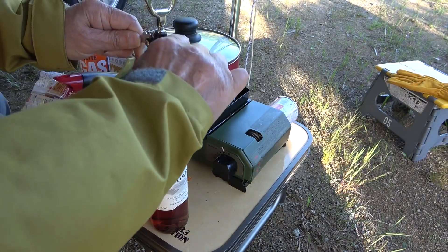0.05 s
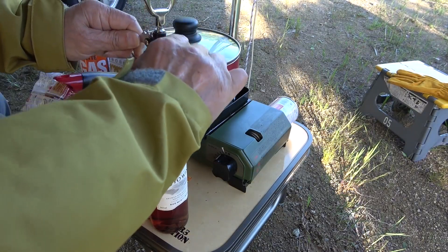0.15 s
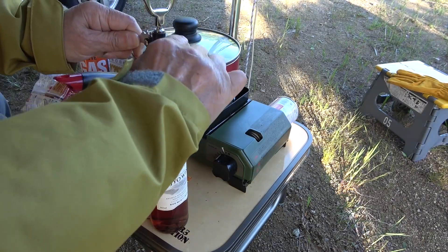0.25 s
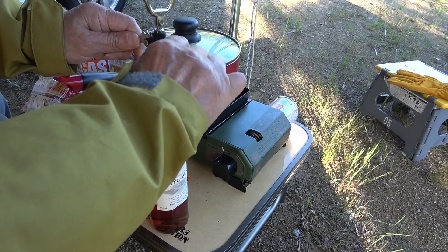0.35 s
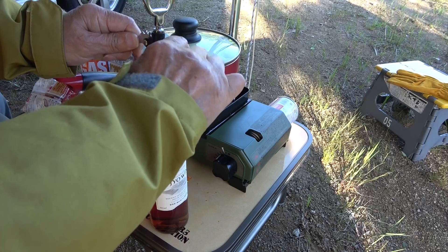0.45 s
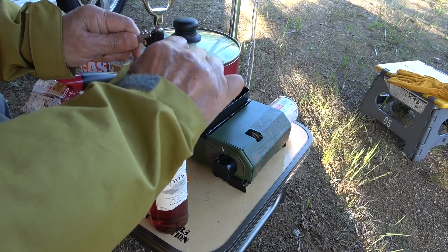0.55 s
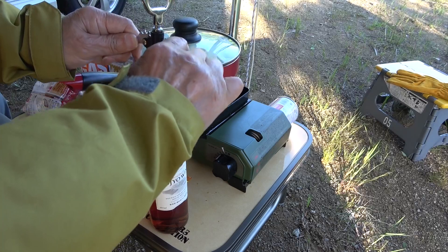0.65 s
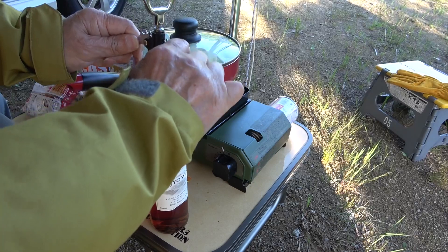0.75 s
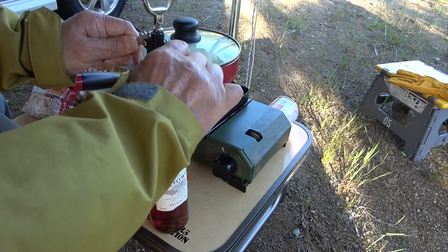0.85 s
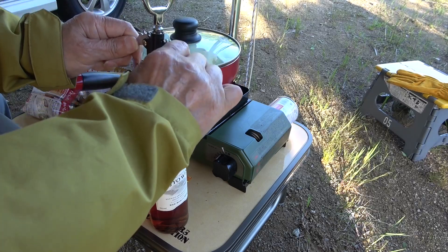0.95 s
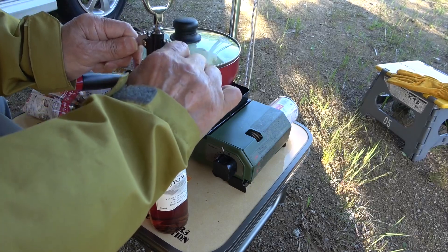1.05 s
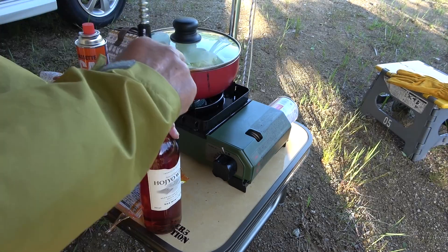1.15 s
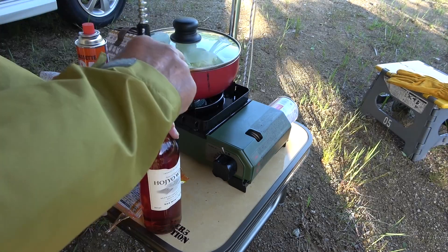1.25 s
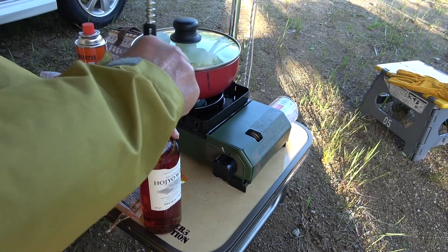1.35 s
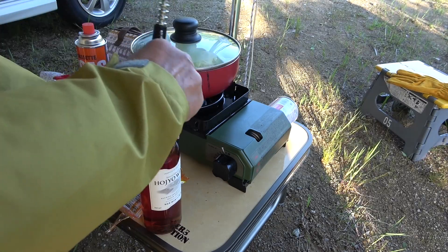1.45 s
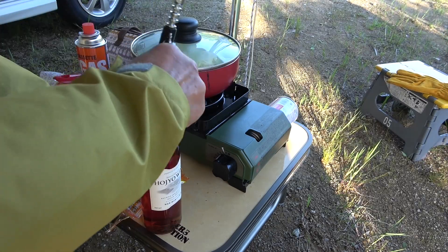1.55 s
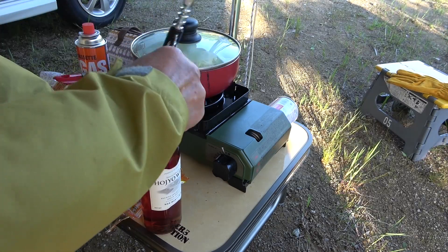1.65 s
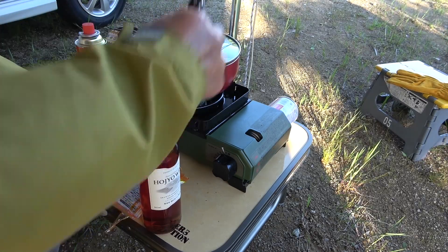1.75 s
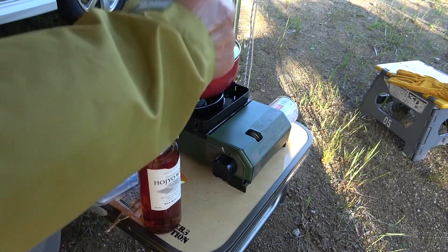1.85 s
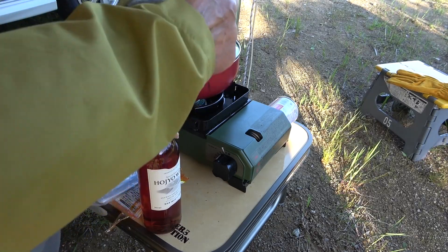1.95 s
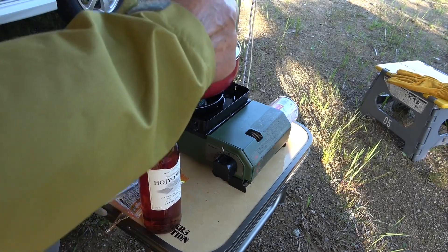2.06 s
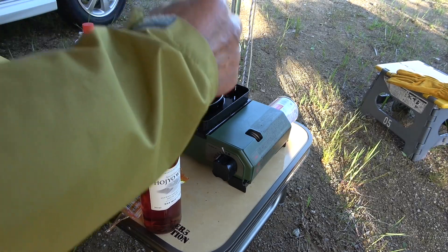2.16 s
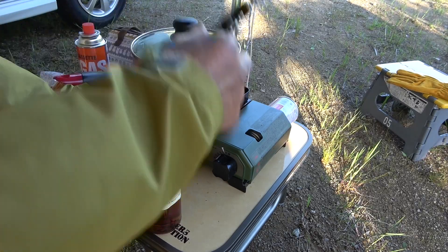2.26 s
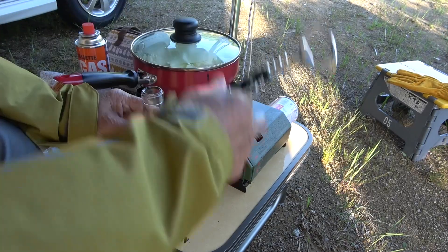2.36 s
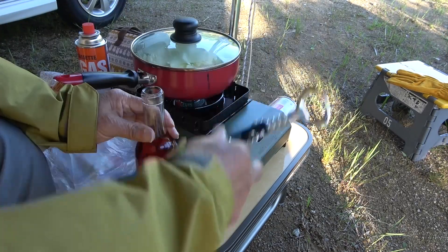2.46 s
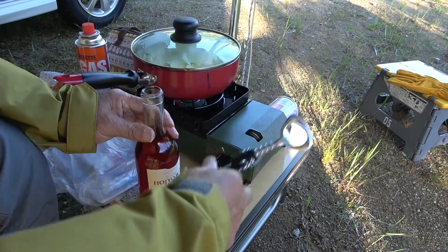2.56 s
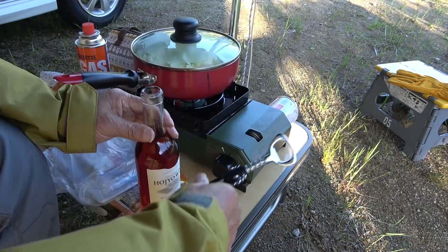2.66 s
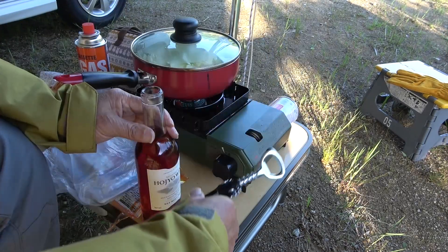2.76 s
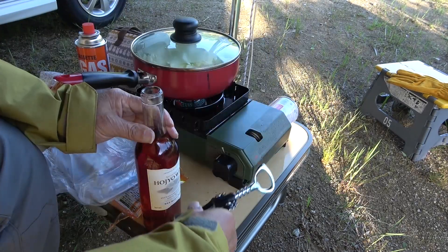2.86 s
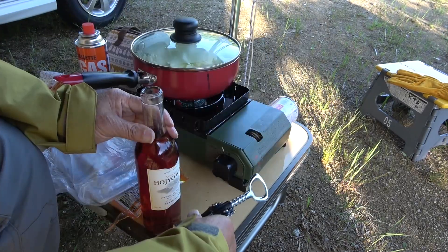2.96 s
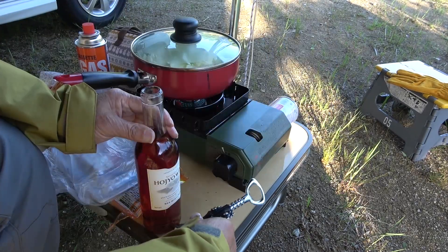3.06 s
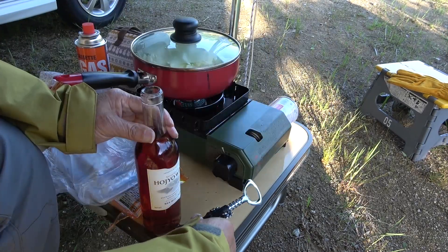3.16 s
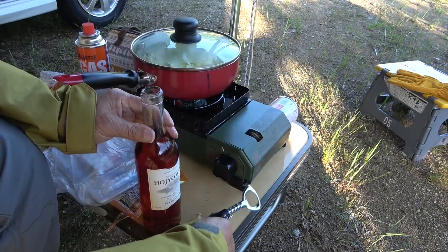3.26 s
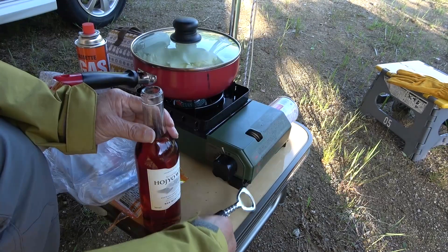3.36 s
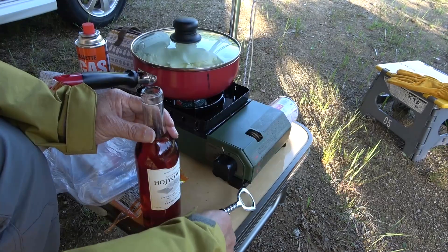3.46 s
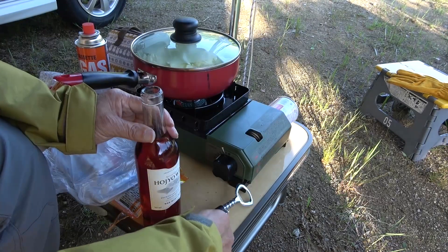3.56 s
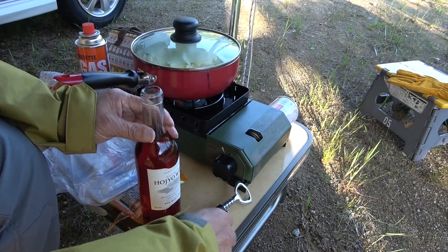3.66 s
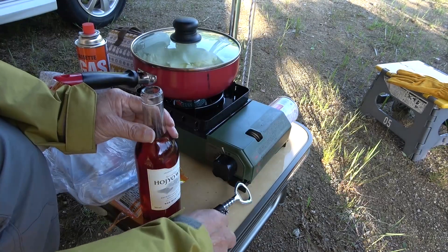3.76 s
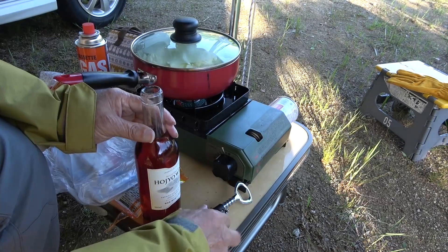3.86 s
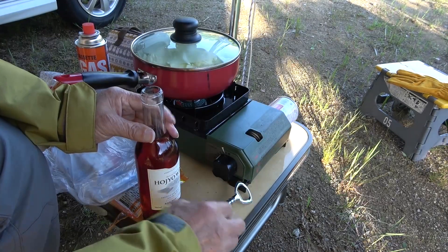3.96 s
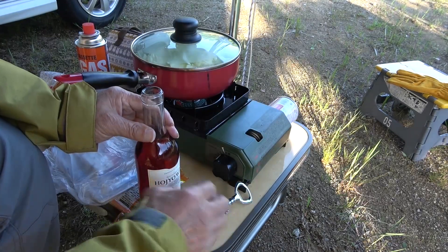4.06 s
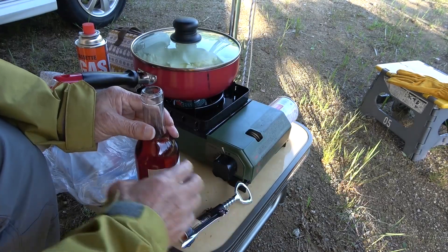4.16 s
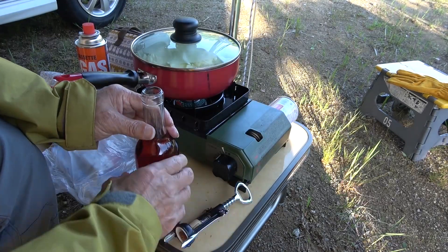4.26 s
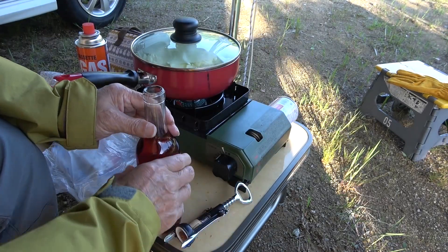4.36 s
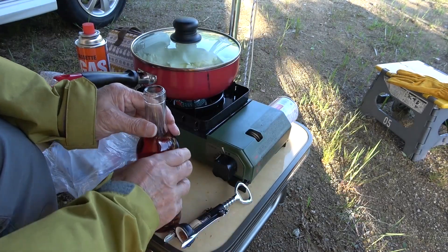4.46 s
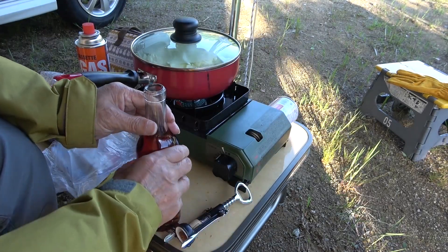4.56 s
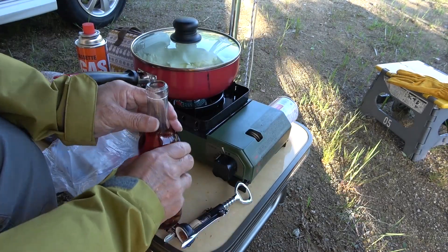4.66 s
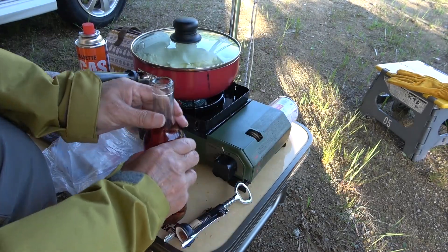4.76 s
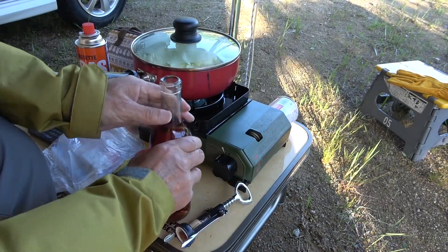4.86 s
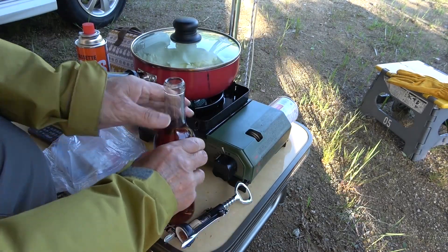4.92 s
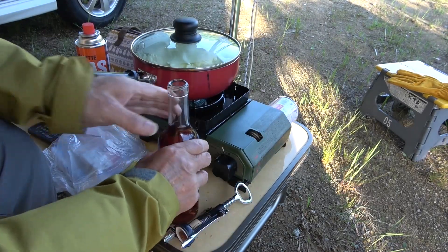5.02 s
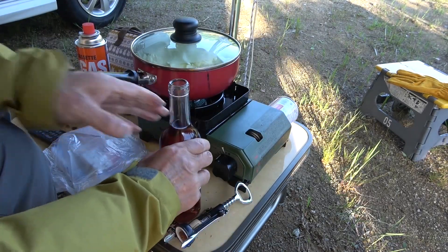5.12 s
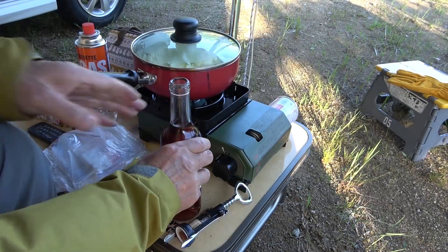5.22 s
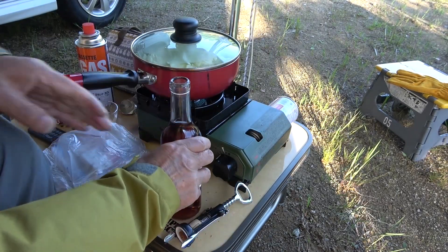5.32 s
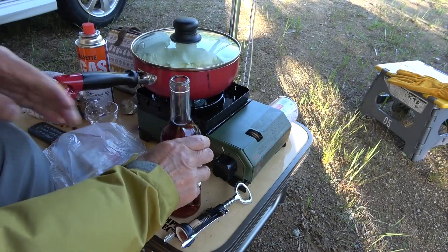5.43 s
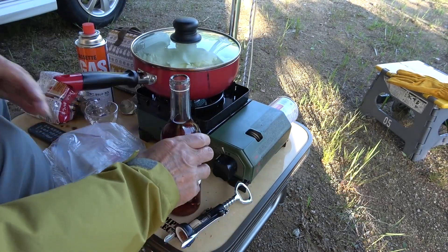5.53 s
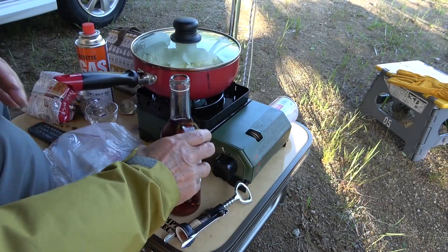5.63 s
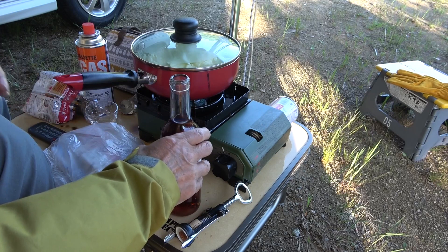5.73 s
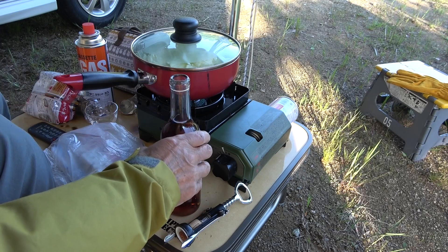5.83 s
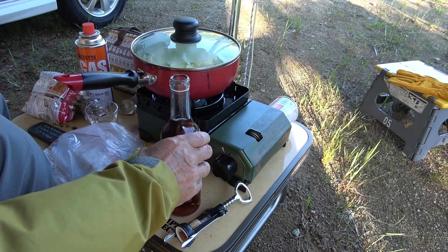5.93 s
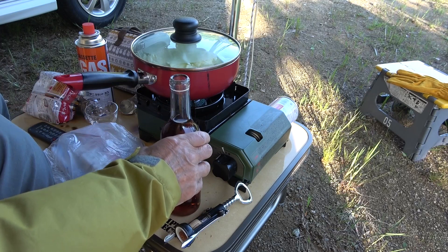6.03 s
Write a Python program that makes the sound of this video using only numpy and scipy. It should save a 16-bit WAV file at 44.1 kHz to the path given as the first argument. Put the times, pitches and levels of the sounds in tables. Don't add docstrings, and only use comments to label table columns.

```python
import sys
import numpy as np
from scipy import signal
from scipy.fft import rfft, irfft
from scipy.io import wavfile
from scipy.ndimage import uniform_filter1d

SR = 44100
rng = np.random.default_rng(int(sys.argv[2]) if len(sys.argv) > 2 else 0)


def convert_level_to_amplitude(level_db):
    exponent = np.asarray(level_db, float) / 20
    return 10 ** exponent


def dump(signal):
    limited = np.clip(np.atleast_2d(signal).T, -1, 1)
    pcm = np.round(limited * 32767).astype(np.int16)
    wavfile.write(sys.argv[1], SR, pcm)


N = 268524
SECONDS = np.arange(N) / SR
BINS = np.arange(N // 2 + 1) * SR / N + 1e-3

# start_s, peak_db, knock_hz, looseness_db, table_boom_db (the last two relative to the peak).
TOOL_BLOWS = [(3.2605, -39, 1170, -5.5, -23), (3.314, -24.5, 1065, -4.5, -27), (3.4087, -3, 1150, -16, -40),
              (3.4135, -5.5, 2440, -7, -13.5), (3.4144, -10, 5640, -5.5, -46),
              (3.4158, -13.5, 1000, -28, -25), (3.4205, -16, 3100, -16, -34), (3.4248, -14, 2700, -7, -24),
              (3.435, -29, 1060, -16, -34), (3.61, -16, 2020, -13, -31), (3.6175, -19, 2100, -17, -32),
              (3.631, -21, 2300, -16, -20), (3.6545, -23, 6600, -14, -40), (3.6655, -21, 1200, -14, -32),
              (3.422, -32, 3200, 3, -33), (3.436, -26, 3300, 1.5, -31), (3.5495, -18, 2220, -11, -12),
              (3.6044, -5.5, 2070, -14, -15.5), (3.6066, -16, 1100, -14, -36),
              (3.654, -16, 1150, -11.5, -10.5), (3.6556, -11.5, 1105, -14, -17),
              (3.6627, -19, 1870, -12.5, -15), (3.6805, -39.5, 900, -21, 15), (3.72, -50, 900, -21, 8),
              (3.777, -47, 905, -21, 10.5), (3.768, -32, 1180, -13, -19), (3.8945, -35, 1160, -11, -22),
              (3.898, -40, 3000, -16, -35), (3.9025, -43, 3030, -16, -35), (3.869, -43, 1100, -10, -19),
              (3.884, -41, 1350, -9, -15), (3.903, -37, 1200, -10, -20), (3.7675, -40, 4000, -14, -30),
              (3.773, -41, 1200, -16, -5), (3.4088, -10, 2550, -16, -40), (3.672, -22.5, 1150, -14, -25),
              (3.68, -30, 1150, -15, -25), (3.843, -48, 1500, -14, -25)]
BOTTLE_BLOWS = [
    (5.003, -35, 1500, -21, -30),
    (5.0114, -12, 1900, -20, -0.5),
    (5.0112, -15.5, 1060, -28, -30),
    (5.0112, -28, 2830, -34, -30),
    (5.0255, -27, 2000, -22, -20),
    (5.02, -26, 1750, -24, 1),
    (5.039, -25.5, 1080, -21, -2),
    (5.167, -26, 1170, -20, -5.5),
    (5.169, -59, 1180, -33, -26),
    (5.171, -46, 1180, -25, -30),
]
POP_BLOWS = [
    (1.698, -21.5, 330, -29, -18),
    (1.7128, -27, 2720, -12.5, 4.5),
    (1.724, -37, 2500, -15, -12),
    (1.7338, -39, 1000, -16, -3),
    (1.747, -19, 330, -37, -10.5),
    (.7667, -31.5, 950, -25, -28),
    (.7671, -32, 2100, -27, -30),
    (1.714, -24, 1500, -30, -30),
    (1.762, -38.5, 400, -30, 4),
    (1.776, -38, 300, -30, 3),
]
TICK_BLOWS = [(1, -56, 5500, -16, -34), (1.701, -40, 4750, -24, -30), (3.3145, -36, 5000, -9, -30),
              (4.471, -45, 2400, -18, -28), (4.599, -45, 4300, -16, -30), (4.788, -24, 2500, -14, -41),
              (5.475, -35.5, 1720, -20, -33), (5.595, -41, 4180, -8, -30), (5.596, -44, 2700, -10, -30),
              (1.7128, -32, 1990, -26, -30), (1.715, -34, 1040, -24, -30), (1.725, -33, 2700, -20, -30),
              (1.736, -39, 1050, -24, -30), (1.7135, -32, 2800, -32, -30), (1.714, -34, 1500, -26, -30),
              (1.734, -33, 6300, -21, -30), (5.021, -21.5, 1850, -28, -30), (5.1713, -30, 1190, -34, -30),
              (4.7885, -27.5, 4800, -19, -32), (4.795, -41, 2400, 0, -30), (3.318, -31.5, 1150, -3.5, -34)]

# pitch_hz, width_hz, level_db
TOOL_RATTLE = [(1056, 100, -7.5), (1180, 170, -8), (1350, 380, -6.5), (1664, 50, -10.5), (2050, 370, -3),
               (2440, 260, -11), (3000, 350, -3), (3260, 320, -17), (4230, 320, -9), (4840, 430, -21),
               (5940, 1100, -10), (8700, 630, -11), (10200, 2900, -12.5)]
BOTTLE_RATTLE = [(640, 190, 10), (760, 120, 1), (930, 160, 4), (1150, 180, 3.5), (1850, 70, -0.5),
                 (2250, 200, 0), (2800, 380, 1.5), (5000, 3000, -18)]
POP_RATTLE = [(690, 250, 1), (1000, 240, 3), (1380, 310, 0), (2180, 160, 0), (2840, 760, 1),
              (3900, 1900, -5), (7000, 4200, -2)]
TICK_RATTLE = [(2500, 2700, 1), (4300, 940, 0.5), (5000, 940, -20), (6300, 1500, -26)]

# pitch_hz, level_db, t60_s, delay_s; bending waves bring the lows late
BARE_TABLE = [(140, -17, 0.25, 0.0056), (186, -6, 0.088, 0.0115), (231.5, -10.5, 0.21, 0.00777),
              (269, -6.5, 0.19, 0.00925), (420, -4, 0.031, 0.00595), (507, -10.5, 0.11, 0.00598)]
LOADED_TABLE = [(170, -30, 0.1, 0.0036), (211, -10.5, 0.12, 0.0036), (227, -7, 0.13, 0.0043),
                (243, -6.5, 0.17, 0.0038), (268, -10, 0.15, 0.00305), (330, -22, 0.071, 0.0021),
                (401, -5, 0.028, 0.0012), (440, 1.5, 0.04, 0.00397), (493, -10, 0.086, 0.0049),
                (764, -4.5, 0.029, 0.0023)]
JERKED_TABLE = [(96, -13.5, 0.19, 0.0076), (153, -10, 0.1, 0.0024), (232, 4, 0.068, 0.002),
                (183, -11.5, .12, 0.0043), (282.5, -16, 0.26, 0.0073), (330, -17.5, 0.1, 0.0059),
                (484, -7.5, 0.17, 0.00286)]

# start_s, level_db
STEEL_BLOWS = [
    (3.4122, -15.5),
    (3.6571, -31.5),
]
# pitch_hz, level_db, t60_s
STEEL_TONES = [(893, -17, 0.086), (1030, -9, .09), (1300, -10, .07), (1665, -6, 0.083), (1890, -4, 0.063),
               (2260, -9, 0.14), (2450, -5, 0.11), (2670, -7, 0.11), (2950, -3, 0.088), (3090, -12, 0.11),
               (4090, -5, 0.088), (4490, -11, 0.076), (5405, -11, .047), (6000, -12, .05)]
# peak_s, rise_s, fall_s, table_ring_db, scrape_above_ring_db
SLIDES = [
    (3.38, 0.018, 0.037, -47.5, -30),
    (3.406, 0.0048, 0.013, -40, 13),
    (3.49, 0.028, .012, -40, -10),
    (3.525, 0.034, 0.023, -35.5, -9),
    (3.555, 0.024, 0.023, -42.5, 11.5),
    (3.59, 0.018, 0.13, -40.5, -8),
    (3.74, 0.035, 0.015, -50, -16),
]
# peak_s, rise_s, fall_s, squeak_db, hiss_above_squeak_db
CORK_SLIPS = [
    (1.684, 0.0047, .008, -51.5, 11.5),
    (1.693, 0.0053, 0.0036, -35, 0),
    (1.697, .003, 0.0091, -53, 10),
]
# start_s, length_s, start_hz, end_hz, level_db
SQUEAKS = [(1.791, 0.17, 1536, 1535, -60.5), (2.036, 0.047, 1790, 1480, -57),
           (2.19, 0.038, 2050, 2010, -61), (2.274, 0.03, 1830, 1830, -56.5), (2.292, 0.03, 1950, 2230, -56),
           (2.312, 0.05, 2270, 2280, -59), (2.466, 0.03, 2050, 2000, -54), (2.492, 0.019, 1850, 1800, -57),
           (2.655, 0.018, 4410, 4370, -58), (2.68, 0.03, 3500, 3480, -64), (2.587, 0.04, 3500, 3480, -59.5),
           (2.715, .05, 3500, 3450, -64), (4.35, 0.13, 5870, 5800, -65), (4.47, 0.12, 5800, 5950, -65)]

# peak_s, rise_s, fall_s, level_db, brightness_db
SLEEVE_STROKES = [(.62, 0.15, 0.29, -62.5, -1), (1.205, .012, .015, -57.5, 2),
                  (1.5, 0.12, 0.072, -63.5, 4.5), (1.72, 0.039, 0.13, -50.5, 1), (1.9, .04, 0.055, -61, 8),
                  (2.55, 0.23, 0.67, -57, 1.5), (3.1, 1, 0.69, -59.5, 3), (3.56, 0.073, 0.11, -65, 8),
                  (3.95, 0.17, 0.64, -59, 1.5), (4.4, 0.64, 1, -58, -1.5),
                  (4.755, 0.035, 0.15, -46.5, -0.5), (4.85, 0.093, 0.13, -48.5, -5),
                  (5.1, 0.29, 0.22, -46, -1), (5.25, 0.11, 0.088, -49, 3), (5.355, 0.11, 0.058, -42.5, 1.5),
                  (5.42, 0.056, 0.11, -46, -7), (5.6, 0.13, 0.15, -55.5, -4), (5.95, 0.26, 0.46, -57, 2.5)]
# pitch_hz, width_hz, level_db, share_of_brightness, rest_db
SLEEVE_ZONES = [(1400, 2230, 0.5, -0.3, -69.5), (2500, 620, -12, 0.5, -74), (5530, 4500, -2, 0.66, -75),
                (11500, 8900, -12.5, 2, -64.5), (6300, 1200, -14, 0.0075, -84)]
# peak_s, rise_s, fall_s, level_db
GRIP_STROKES = [
    (2.17, 0.028, 0.44, -59.5),
    (3.57, 0.07, 0.079, -52),
    (4.86, 0.099, 0.051, -48),
    (5.34, 0.12, 0.08, -41),
    (5.25, 0.054, .05, -57),
    (5.43, .04, .05, -53),
]
# peak_s, rise_s, fall_s, level_db
WEAVE_STROKES = [
    (4.78, 0.06, .15, -56),
    (4.93, .1, 0.13, -54),
    (5.09, 0.14, 0.084, -49.5),
    (4.45, .15, .15, -68),
]

# pitch_hz, level_db (per Hz)
FLAME_COLOUR = [(22, -48), (31, -12.5), (60, -9.5), (180, -2.5), (217, -5.5), (242, -3.5), (344, 0),
                (394, -3.5), (451, -3), (677, -14.5), (863, -14.5), (1700, -27), (2840, -27.5), (3160, -29),
                (9840, -33.5), (16000, -86)]
# time_s, roar_db, lean_left_db
FLAME_LEVEL = [(0, -45, 0), (.5, -47, 0), (1.3, -45, 0), (2.0, -45.5, -0.5), (2.5, -45.5, -1.5),
               (2.9, -45, 0), (3.3, -44.5, 1.5), (3.7, -43, -2.2), (4.2, -44.5, 1.5), (4.8, -44, 1),
               (5.3, -43.5, .3), (5.6, -43.5, 2.2), (6.09, -45.5, 0.8)]
# pitch_hz, width_hz, behind_hands_db, hands_lifted_db, later_drift_db_per_s
JETS = [(1303, 68, -68.5, -67.5, -1), (2850, 61, -68.5, -69.5, 0), (8250, 140, -70, -69.5, 0),
        (9620, 260, -73.5, -88, 2.5), (11600, 250, -88, -82, 1.5), (12680, 220, -79, -83, 2.5)]
# pitch_hz, width_hz, peak_s, rise_s, level_db
FLARES = [
    (11550, 130, 1.5, 0.37, -76),
    (11600, 250, 2.65, .4, -68.5),
    (12600, 250, 1.2, .25, -74),
    (12650, 200, 4.2, .4, -75),
    (11500, 200, 6, .2, -74),
    (11500, 200, 4, .3, -75),
    (9460, 150, 4.1, .5, -78),
]
# peak_s, rise_s, fall_s, level_db
RUMBLE_SWELLS = [
    (.05, .5, 1.3, -50.5),
    (.9, .5, .35, -52),
    (1.88, .3, .08, -60),
]

# pitch_hz, likeness_0_to_1
LIKENESS = [(30, .97), (60, 1), (130, 0.94), (290, 0.98), (640, 0.93), (1410, 0.99), (3100, 1), (6820, 0.9),
            (15000, 0.3)]
# pitch_hz, left_minus_right_db
MICROPHONE_LEAN = [(60, -1), (110, 0.5), (200, 4.5), (380, 2), (700, 2), (1290, 2), (2380, 1), (4400, 3.5),
                   (8120, 0), (15000, -1)]
# pitch_hz, level_db
BODY_SCATTER = [(30, -51), (2000, -49), (4500, -46), (6500, -6), (10000, -13), (16000, -14)]

CRACK_REACH = 3.9
SWELL_DROP_DB, SWELL_POWER = 10.5, 1.57
RUMBLE_REST_DB = -81
HANDS_LIFT_S, LIFT_TAKES_S = 0.89, 0.15


def on_log(points):
    hz, value = np.transpose(points)
    return np.interp(np.log(BINS), np.log(hz), value)


def curves(table):
    s, *columns = np.transpose(table)
    return [np.interp(SECONDS, s, column) for column in columns]


def unit(x):
    return x / np.sqrt(np.mean(x ** 2))


def band(x, hz, width_hz):
    return signal.lfilter(*signal.iirpeak(hz, hz / width_hz, SR), x)


def double_band(x, hz, width_hz):
    return band(band(x, hz, width_hz), hz, width_hz)


def walk(rate):
    hold = int(SR / rate)
    steps = np.repeat(rng.standard_normal(N // hold + 1), hold)
    return 0.46 * uniform_filter1d(uniform_filter1d(steps, hold), hold)[:N]


def fade_out(t, t60):
    return np.exp(-np.log(1000) * t / t60)


def ring(hz, t60, t):
    return np.sin(2 * np.pi * hz * t) * fade_out(np.maximum(t, 0), t60) * (t > 0)


def swells(rows, colour=0):
    power = 0
    for s, rise, fall, db, *tint_db in rows:
        away = abs(SECONDS - s) / np.where(SECONDS < s, rise, fall)
        loss_db = np.minimum(SWELL_DROP_DB * away ** SWELL_POWER, 200)
        power = power + convert_level_to_amplitude(db + colour * sum(tint_db) - loss_db) ** 2
    return np.sqrt(power)


def wide_noise():
    alike = np.clip(on_log(LIKENESS), 0, 1)
    mid = rfft(rng.standard_normal(N))
    side = rfft(rng.standard_normal(N))
    return np.sqrt((1 + alike) / 2) * mid + np.sqrt((1 - alike) / 2) * side * np.array([[1], [-1]])


def pan(x, db):
    return x * convert_level_to_amplitude(np.array([[db], [-db]]) / 2)


def knocks(events, body, top, rise_cycles, knock_cycles, crack_t60, rattle_t60, crack_hz, bounce_db, crack_db):
    out, t = np.zeros(N + SR), np.arange(SR // 3) / SR
    for s, db, hz, loose_db, boom_db in events:
        crack_noise, bounce_noise, rattle_noise = rng.standard_normal((3, len(t)))
        contact = np.exp(-(t * hz / knock_cycles) ** 2) * np.minimum(t * hz / rise_cycles, 1)
        knock = np.sin(2 * np.pi * hz * t) * contact

        crack = double_band(crack_noise, crack_hz, crack_hz * 1.8) * fade_out(t, crack_t60)
        crack_top_hz = min(hz * CRACK_REACH, 0.45 * SR)
        crack = signal.lfilter(*signal.butter(N=2, Wn=crack_top_hz, fs=SR), crack)

        bounces = unit(uniform_filter1d(bounce_noise, SR // 400))
        shake = rattle_noise * convert_level_to_amplitude(bounce_db * bounces) * np.minimum(t / 0.00032, 1)
        rattle = 0
        for f, width, gain_db in body:
            fade = np.exp(-np.log(1000) * t / rattle_t60 * (f / 2000) ** 0.084)
            dull_db = 45.0 * np.log2(min(hz / 2600, 1)) * np.log2(max(f / 6000, 1))
            level = convert_level_to_amplitude(gain_db + dull_db) * np.sqrt(SR / width / 10)
            rattle = rattle + level * band(band(shake * fade, f, width), f, 3 * width)

        boom = 0
        for f, gain_db, t60, delay in top:
            onset = np.clip((t - delay) / 0.0041, 0, 1)
            boom = boom + convert_level_to_amplitude(gain_db) * ring(f, t60, t - delay) * onset

        loose = convert_level_to_amplitude(loose_db) * (convert_level_to_amplitude(crack_db) * crack + rattle)
        i = int(s * SR)
        out[i:i + len(t)] += convert_level_to_amplitude(db) * (knock + loose + convert_level_to_amplitude(boom_db) * boom)
    return out[:N]


def dropped_tool():
    return knocks(TOOL_BLOWS, TOOL_RATTLE, BARE_TABLE, rise_cycles=0.9, knock_cycles=4.4, crack_t60=0.014,
                  rattle_t60=0.11, crack_hz=4800, bounce_db=3.0, crack_db=4.0)


def clang():
    out = 0
    for s, db in STEEL_BLOWS:
        for k, (f, gain_db, t60) in enumerate(STEEL_TONES):
            out = out + (-1) ** k * convert_level_to_amplitude(db + gain_db) * ring(f, t60, SECONDS - s)
    return out


def slide():
    slip = rng.standard_normal(N) * convert_level_to_amplitude(1.3 * walk(220))
    hum = band(band(slip, 1130, 100), 1010, 260)
    scrape = double_band(slip, 2150, 1200)
    return unit(hum) * swells(SLIDES) + unit(scrape) * swells(SLIDES, 0.66)


def pop():
    return knocks(POP_BLOWS, POP_RATTLE, JERKED_TABLE, rise_cycles=0.32, knock_cycles=0.75, crack_t60=0.015,
                  rattle_t60=0.17, crack_hz=4500, bounce_db=4.0, crack_db=6)


def cork():
    slip = rng.standard_normal(N) * convert_level_to_amplitude(1.7 * walk(482))
    squeak = band(band(slip, 2240, 1100), 2300, 1100)
    hiss = double_band(slip, 6200, 4900)
    return unit(squeak) * swells(CORK_SLIPS) + unit(hiss) * swells(CORK_SLIPS, 1)


def bottle():
    return knocks(BOTTLE_BLOWS, BOTTLE_RATTLE, LOADED_TABLE, rise_cycles=0.59, knock_cycles=3.4,
                  crack_t60=0.035, rattle_t60=0.11, crack_hz=3000, bounce_db=3.0, crack_db=5)


def ticks():
    return knocks(TICK_BLOWS, TICK_RATTLE, BARE_TABLE, rise_cycles=1.4, knock_cycles=5.3, crack_t60=0.0089,
                  rattle_t60=0.092, crack_hz=3500, bounce_db=-0.5, crack_db=-5)


def squeaks():
    out, tremble = np.zeros(N), walk(160)
    for s, length, start_hz, end_hz, db in SQUEAKS:
        i = int(s * SR)
        u = np.linspace(0, 1, int(length * SR))
        glide_hz = np.interp(u ** 2.2, [0, 1], [start_hz, end_hz])
        pitch_hz = glide_hz * (1 + 0.016 * tremble[i + 200:][:len(u)])
        tone = np.sin(2 * np.pi * np.cumsum(pitch_hz) / SR)
        out[i:i + len(u)] += convert_level_to_amplitude(db) * np.sqrt(2) * tone * np.sin(np.pi * u) ** 0.5
    return out * (1 + 0.55 * walk(90) + 0.6 * walk(260))


def rubbing():
    grain, out = walk(170), 0
    for zone, (hz, width, db, share, rest_db) in enumerate(SLEEVE_ZONES):
        power = (convert_level_to_amplitude(db) * swells(SLEEVE_STROKES, share)) ** 2 + convert_level_to_amplitude(rest_db) ** 2
        if zone == 1:
            power = power + swells(GRIP_STROKES) ** 2
        if zone == 4:
            power = power + swells(WEAVE_STROKES) ** 2
        hiss = unit(double_band(irfft(wide_noise(), N), hz, 1.42 * width))
        roughness_db = -2.5 + 2.4 * grain + 0.6 * walk(25)
        out = out + hiss * np.sqrt(power) * convert_level_to_amplitude(roughness_db)
    return out


def flame():
    roar_db, lean_db = curves(FLAME_LEVEL)
    spectrum, out, swell = wide_noise() * convert_level_to_amplitude(on_log(FLAME_COLOUR)), 0, walk(4.9)
    for hz in 25 * 2 ** np.arange(0, 9.6, 0.5):
        share = np.clip(1 - abs(2 * np.log2(BINS / hz)), 0, 1)
        flutter_db = (0.19 * swell + 3.1 * walk(19)) * min(1, (500 / hz) ** 0.5)
        out = out + irfft(spectrum * np.sqrt(share), N) * convert_level_to_amplitude(flutter_db)
    return unit(out) * convert_level_to_amplitude(roar_db - 1.0 + lean_db * np.array([[0.5], [-0.5]]))


def jets():
    lifted = np.clip((SECONDS - HANDS_LIFT_S) / LIFT_TAKES_S, 0, 1)
    out = 0
    for f, width, hidden_db, open_db, drift_db in JETS:
        whistle = unit(band(rng.standard_normal(N), f, width))
        change_db = open_db - hidden_db + drift_db * (SECONDS - HANDS_LIFT_S)
        waver_db = 2.7 * walk(13.0) + 5.1 * walk(1.61)
        out = out + whistle * convert_level_to_amplitude(hidden_db + lifted * change_db + waver_db)
    for f, width, s, rise, db in FLARES:
        whistle = unit(band(rng.standard_normal(N), f, width))
        out = out + whistle * swells([(s, rise, 2 * rise, db)])
    return out


def rumble():
    sway = unit(double_band(rng.standard_normal(N), 31, 11.0))
    return sway * np.hypot(swells(RUMBLE_SWELLS), convert_level_to_amplitude(RUMBLE_REST_DB)) * convert_level_to_amplitude(-5.5)


def scene():
    steel = pan(dropped_tool() + clang() + slide(), 0.066)
    opening = pan(pop() + cork(), 0.49)
    glass = pan(bottle(), 2.5)
    small_parts = pan(ticks() + squeaks(), 1.9)
    sleeve = pan(rubbing(), 5.1)
    burner = flame() + jets() + rumble()
    return steel + opening + glass + small_parts + sleeve + burner


def top_cut(x):
    return signal.sosfilt(signal.butter(12, 15800, fs=SR, output="sos"), x)


def record(dry):
    left, right = rfft(dry) * convert_level_to_amplitude(on_log(MICROPHONE_LEAN) * np.array([[0.5], [-0.5]]))
    mid = (left + right) / 2 / (1 + (BINS / 16300) ** 60)
    smear = rng.standard_normal(SR // 12) * np.exp(-np.arange(SR // 12) / (0.012 * SR))
    scattered = mid * convert_level_to_amplitude(on_log(BODY_SCATTER)) * rfft(smear / np.linalg.norm(smear), N)
    side = ((left - right) / 2 + scattered) * np.where(BINS < 11100, 1, 0.05)
    wet = irfft(np.array([mid + side, mid - side]), N)
    return top_cut(np.clip(wet, -1, 1))


dry = scene()
out = record(dry)
dump(out)
```